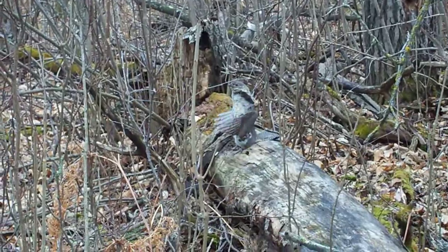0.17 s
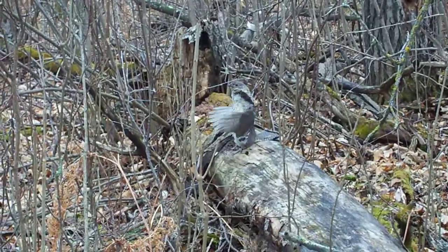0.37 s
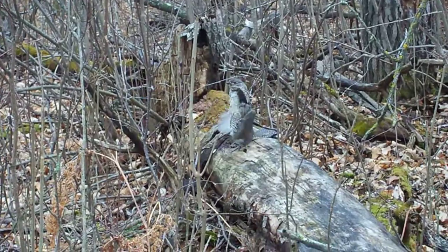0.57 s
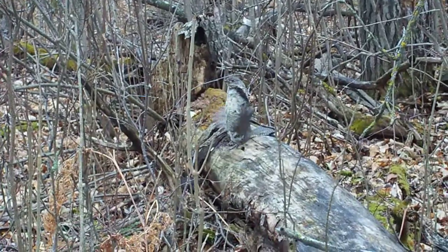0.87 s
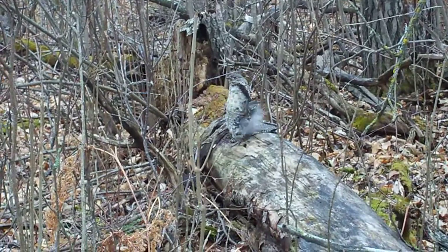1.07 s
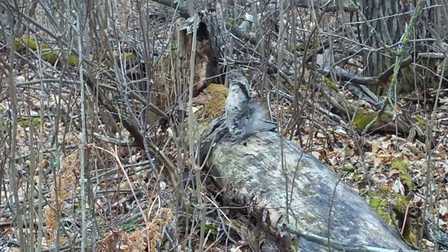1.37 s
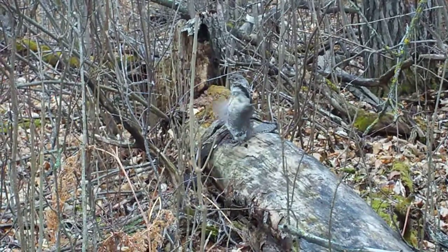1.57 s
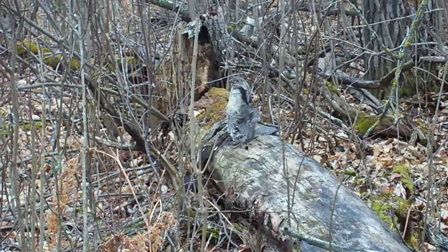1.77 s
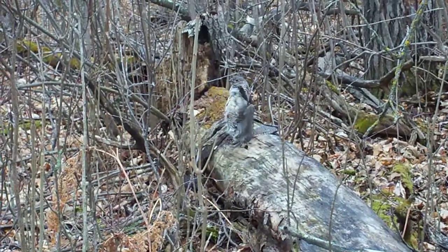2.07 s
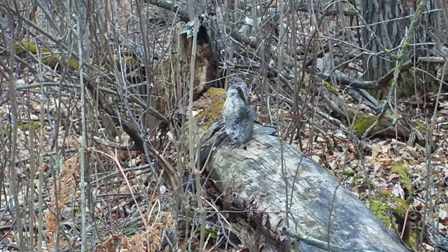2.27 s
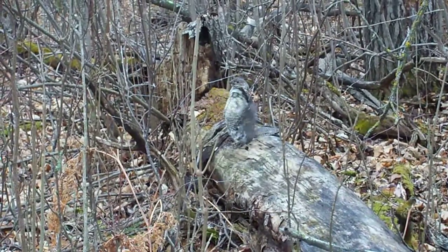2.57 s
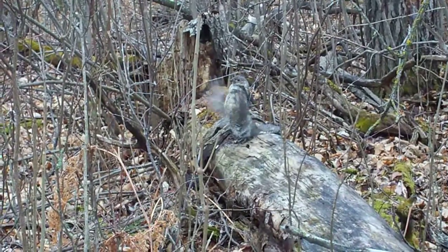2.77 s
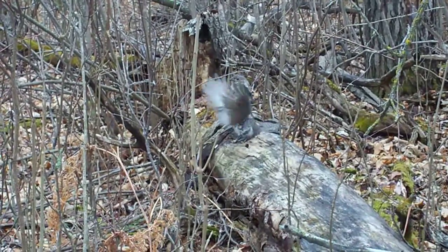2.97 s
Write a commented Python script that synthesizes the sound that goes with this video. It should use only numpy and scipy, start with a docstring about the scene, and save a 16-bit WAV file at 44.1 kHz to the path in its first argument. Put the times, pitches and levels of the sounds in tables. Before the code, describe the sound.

A grouse beats its wings on a log. Deep, chesty thumps near 55 hertz start at 0.1 seconds, roughly a quarter second apart, each with a faint feathery swish, flick and occasional dry quill tick. They quicken steadily, about eight a second by 2 seconds, blurring into a fluttering whir around 2.6 to 3. Faint echoes and a low boom among trees; quiet rumble and soft hiss, mono.

```python
"""A quiet forest, where a ruffed grouse drums on a log: single wing beats speed up into a whir.
Each beat is a short, deep swing of air pressure with two echoes and a diffuse boom among the trees.
The feathers are layers of grainy noise that lift, swish, buffet and flick, with ticks of snapping quills.
Leaf litter and trunks scatter the rustle as trailing noise, over a lumpy low rumble and a steady hiss."""
import sys
import numpy as np
from scipy import signal
from scipy.fft import rfft, irfft
from scipy.io import wavfile

SR = 44100
rng = np.random.default_rng(int(sys.argv[2]) if len(sys.argv) > 2 else 0)


def wav_record(signal):
    """Record a signal, one row per channel, as 16-bit PCM in the file named by sys.argv[1]."""
    frames = np.transpose(np.atleast_2d(signal))
    bounded = np.clip(frames, -1, 1)
    # unit amplitude maps onto the largest positive 16-bit level
    quanta = np.round(bounded * 32767).astype(np.int16)
    wavfile.write(sys.argv[1], SR, quanta)


N = 138033
TIME = np.arange(N) / SR


def amp(db):
    """Decibels to amplitude gain."""
    return 10 ** (np.asarray(db) / 20)


def unit(x):
    """Scales a signal to an rms of 1."""
    return x / np.sqrt(np.mean(x ** 2) + 1e-20)


def noise():
    """White noise of the scene's length."""
    return rng.standard_normal(N)


def read(points, hz):
    """Reads a spectrum table on a log-frequency axis."""
    table_hz, value = np.transpose(points)
    return np.interp(np.log(hz + 1), np.log(table_hz + 1), value)


def colour(x, spectrum):
    """Equalizes a signal with a table of gains, padded so that the end does not wrap round."""
    hz = np.fft.rfftfreq(2 * N, 1 / SR)
    return irfft(rfft(x, 2 * N) * amp(read(spectrum, hz)))[:N]


def wander(seconds):
    """Smooth random motion of rms 1 on the given time scale."""
    hz = np.fft.rfftfreq(N, 1 / SR)
    low_pass = np.exp(-(2 * hz * seconds) ** 2)
    return unit(irfft(rfft(noise()) * low_pass, N))


def swell(centre, rise, fall):
    """A bell-shaped envelope with its own rise and fall times."""
    t = TIME - centre
    return np.exp(-.5 * (t / np.where(t < 0, rise, fall)) ** 2)


def swells(times, dbs, rise, fall):
    """One swell for each beat."""
    levels = np.broadcast_to(dbs, len(times))
    return sum(amp(db) * swell(s, rise, fall) for s, db in zip(times, levels))


# background colours: (frequency [Hz], relative level [dB])
RUMBLE = [(15, -3), (32, -0.5), (58, -5), (85, -7), (120, -13.5), (200, -20.5), (400, -41.5), (1000, -68.5)]
HISS = [(60, 6), (200, 10.5), (400, 6.5), (750, 5), (1300, 0.5), (2500, -1.5), (5000, -3), (7400, -4.5),
        (8500, -9)]
RUMBLE_DB, HISS_DB = -54.5, -61  # rms levels
RUMBLE_SWELL_DB = 2.0  # rms of the level's wander


def background():
    """Low-weighted noise with a wandering level makes the rumble; a second, steady noise the hiss."""
    lumps = amp(RUMBLE_SWELL_DB * wander(.12))
    rumble = unit(colour(noise(), RUMBLE) * lumps)
    hiss = unit(colour(noise(), HISS))
    return amp(RUMBLE_DB) * rumble + amp(HISS_DB) * hiss


# wing beats, levels before the tone tables: (time [s], thump level [dB], thump pitch [Hz],
# swish level [dB], buffet level [dB], flick level [dB])
BEATS = [(0.0797, -23.4, 58, -53.5, -51, -54.5), (0.342, -24.9, 57, -54, -62, -50.5),
         (0.5807, -24, 56.2, -53.5, -48.5, -58), (0.797, -24.6, 58.7, -52, -60.5, -55),
         (0.9962, -24.5, 57.7, -52, -55.5, -57), (1.1807, -23.5, 56.6, -51.5, -55.5, -51),
         (1.3519, -25, 56, -52, -50, -55.5), (1.5113, -26, 54.7, -51.5, -51.5, -56.5),
         (1.6589, -26, 59, -53.2, -57, -51), (1.7936, -27, 56, -52, -53.9, -55),
         (1.9175, -28, 53, -55, -48, -53), (2.0355, -27, 53, -54, -58, -55.5),
         (2.1435, -27.5, 54.4, -55, -54.5, -54.5), (2.2459, -26, 54.7, -54, -55.5, -60),
         (2.339, -26.4, 54.3, -54.5, -56.5, -53.5), (2.4288, -28, 54.5, -54.7, -55.5, -54.5),
         (2.5098, -26, 55.3, -54, -53.5, -58), (2.5857, -27, 55, -54, -53.5, -50.5),
         (2.6553, -27.5, 56.7, -55, -47.5, -50), (2.7197, -26.5, 55, -55, -47, -49.5),
         (2.7777, -25, 53.5, -56, -44.5, -49), (2.8315, -26.5, 48, -53.5, -46, -54.5),
         (2.8811, -25, 51.5, -53.5, -45.5, -53), (2.9398, -25, 54, -54, -48.5, -51),
         (3.0049, -23.5, 54.7, -55.5, -52, -55.7), (3.074, -23, 53.4, -55.5, -57, -56)]
# tone of the feather noise; whir and lift share the swish's: (frequency [Hz], gain [dB])
SWISH = [(100, 17.5), (180, 17.5), (240, 11), (310, 15.5), (430, 7), (620, 16), (850, 15.5), (1080, 11.5),
         (1350, 13.5), (1850, 6), (3300, 6), (5200, 2), (7200, 3), (8500, -6.5)]
BUFFET = [(90, 15.5), (180, 24), (240, 16), (310, 22.5), (430, 4), (650, 22.5), (850, 15), (1100, 6.5),
          (1800, -1), (4000, -1.5), (8000, -8.5)]
FLICK = [(100, 1.5), (300, 11), (430, 8), (650, 11.5), (850, 19), (1100, 8), (1850, 3.5), (3300, 3),
         (5200, -1), (7200, 3), (8500, -5)]
# swell timing [s] around each beat
WHIR_LEAD_S, WHIR_WIDTH_S = 0.023, .014
LIFT_LEAD_S, LIFT_RISE_S, LIFT_FALL_S = 0.02, 0.0028, 0.0032
SWISH_LEAD_S, SWISH_RISE_S, SWISH_FALL_S = 0.0074, 0.0051, .012
BUFFET_LAG_S, BUFFET_WIDTH_S = 0.0065, 0.0026
FLICK_LAG_S, FLICK_WIDTH_S = 0.012, 0.0039
LIFT_DB = -59  # raising the wings; before tone
# whir level before tone at WHIR_PER_S beats a second, and its growth per doubling of that rate
WHIR_DB, WHIR_PER_S, WHIR_DB_PER_DOUBLING = -57, 20.2, 20
# grain depth [dB per unit of wander] and time scale [s]
SWISH_GRAIN_DB, BUFFET_GRAIN_DB, FLICK_GRAIN_DB, GRAIN_S = 3.0, 2.35, 3.5, .0009


def rustle(envelope, spectrum, grain_db):
    """Air through feathers: noise broken into tiny grains, then shaped and coloured."""
    grain_level = amp(grain_db * np.clip(wander(GRAIN_S), -2, 2))
    grains = unit(grain_level * noise())
    return colour(envelope * grains, spectrum)


def feathers():
    """Each beat lifts, swishes, buffets the air as it stops and flicks back; fast beats blur into a whir."""
    times, _, _, swish_db, buffet_db, flick_db = np.transpose(BEATS)
    beats_per_s = 1 / np.gradient(times)
    whir_db = WHIR_DB + WHIR_DB_PER_DOUBLING * np.log2(beats_per_s / WHIR_PER_S)
    whir = swells(times - WHIR_LEAD_S, whir_db, WHIR_WIDTH_S, WHIR_WIDTH_S)
    lift = swells(times - LIFT_LEAD_S, LIFT_DB, LIFT_RISE_S, LIFT_FALL_S)
    swish = swells(times - SWISH_LEAD_S, swish_db, SWISH_RISE_S, SWISH_FALL_S)
    buffet = swells(times + BUFFET_LAG_S, buffet_db, BUFFET_WIDTH_S, BUFFET_WIDTH_S)
    flick = swells(times + FLICK_LAG_S, flick_db, FLICK_WIDTH_S, FLICK_WIDTH_S)
    stroke = np.sqrt(whir ** 2 + lift ** 2 + swish ** 2)  # powers add
    return (rustle(stroke, SWISH, SWISH_GRAIN_DB)
            + rustle(buffet, BUFFET, BUFFET_GRAIN_DB)
            + rustle(flick, FLICK, FLICK_GRAIN_DB))


# rustle thrown back by leaf litter close by and by trunks further off, before tone:
# (level [dB], time to fall 60 dB [s])
SCATTERS = [(-10, 0.097), (-13, 0.32)]
# colour of the scattered rustle: (frequency [Hz], gain [dB])
SCATTER_TONE = [(100, 12), (300, 10.5), (430, 6), (720, 12.5), (1300, 5.5), (2200, 6.5), (5000, 1),
                (7200, 3), (8500, -10.5)]


def scatter(x):
    """The wings move, so their scatter never repeats: fresh noise that trails the power of the rustle."""
    trail = np.zeros(N)
    for db, t60 in SCATTERS:
        unit_area = np.log(10 ** 6) / (t60 * SR)
        trail += amp(2 * db) * unit_area * amp(-120 * TIME / t60)  # power, so dB count double
    power = np.abs(signal.fftconvolve(x ** 2, trail)[:N])
    return colour(np.sqrt(power) * noise(), SCATTER_TONE)


THUMP_RISE_S, THUMP_FALL_S, THUMP_LEAD_S = 0.0047, 0.0061, .0014
THUMP_GLIDE_PER_S = 2.6  # the pitch climbs by twice this fraction per second
OVERTONE_DB = -27.5  # octave against the fundamental, before tone


def thump(s, db, hz):
    """Suction, then a push of air: about one and a half swings, rising slightly in pitch."""
    t = np.clip(TIME - s, -.1, .1)  # keeps the exponentials in range
    turn = 2 * np.pi * hz * t * (1 + THUMP_GLIDE_PER_S * t)
    u = t + THUMP_LEAD_S
    push = 2 / (np.exp(-u / THUMP_RISE_S) + np.exp(u / THUMP_FALL_S))
    return amp(db) * push * (np.sin(turn) + amp(OVERTONE_DB) * np.sin(2 * turn))


# tone of the thump after bouncing off log and ground: (frequency [Hz], gain [dB])
THUMP = [(25, 1.5), (45, -1.3), (62, -0.5), (82, 0.5), (104, -8.5), (132, 3), (165, 8), (220, 5)]
# echoes of the thump from nearby trees: (delay [s], level [dB])
ECHOES = [(0.034, -17.5), (0.0473, -18.5)]


def thumps():
    """Every beat's thump, toned by log and ground, plus delayed copies from nearby trees."""
    direct = colour(sum(thump(s, db, hz) for s, db, hz, *_ in BEATS), THUMP)
    echoes = sum(amp(db) * np.interp(TIME - delay, TIME, direct, left=0) for delay, db in ECHOES)
    return direct + echoes


# boom of the thumps among the trees: (frequency [Hz], gain [dB])
FOREST_DB = [(30, -15), (65, -14.5), (100, -13), (160, -11.5), (300, -15)]
FOREST_T60_S, FOREST_RISE_S = 0.5, 0.016


def forest(x):
    """A faint, diffuse low boom: thumps convolved with a noise tail that builds up, then decays."""
    build_up = np.minimum(TIME / FOREST_RISE_S, 1)
    decay = np.exp(-np.log(1000) * TIME / FOREST_T60_S)
    tail = noise() * build_up * decay
    boom = signal.fftconvolve(x, tail / np.linalg.norm(tail))[:N]
    return colour(boom, FOREST_DB)


# quills snapping past each other: (time [s], nominal peak level [dB], centre frequency [Hz])
SNAPS = [(0.092, -38.5, 3350), (1.1921, -41, 4950), (1.3652, -43, 5500), (2.7354, -49, 2290),
         (2.7882, -41, 4200), (2.8915, -41, 3700), (2.9508, -45, 6000), (2.9792, -42, 2500)]
SNAP_S, SNAP_SPREAD_OCTAVES = 0.00068, 0.44


def snaps():
    """Millisecond ticks of stiff quills: short bursts of band-limited noise."""
    octaves = np.log2(np.fft.rfftfreq(N, 1 / SR) + 1)
    out = np.zeros(N)
    for s, db, hz in SNAPS:
        band = np.exp(-.5 * ((octaves - np.log2(hz)) / SNAP_SPREAD_OCTAVES) ** 2)
        tick = unit(irfft(rfft(noise()) * band, N))
        out += amp(db) / 2 * swell(s, SNAP_S / 2, SNAP_S) * tick  # noise peaks near twice its rms
    return out


def scene():
    """The bird, the forest's answer and the background, in mono."""
    air = thumps()
    wings = feathers() + snaps()
    return (air + forest(air) + wings + scatter(wings) + background())[None]


OFFSET = -.0247  # full scale is 1
EDGE_HZ = 8330


def record(dry):
    """The recorder's band limit, a steep low-pass, and its constant offset."""
    low_pass = signal.firwin(141, EDGE_HZ, window=("kaiser", 8), fs=SR)
    return OFFSET + signal.oaconvolve(dry, low_pass[None], "same")


dry = scene()
out = record(dry)
wav_record(out)
```